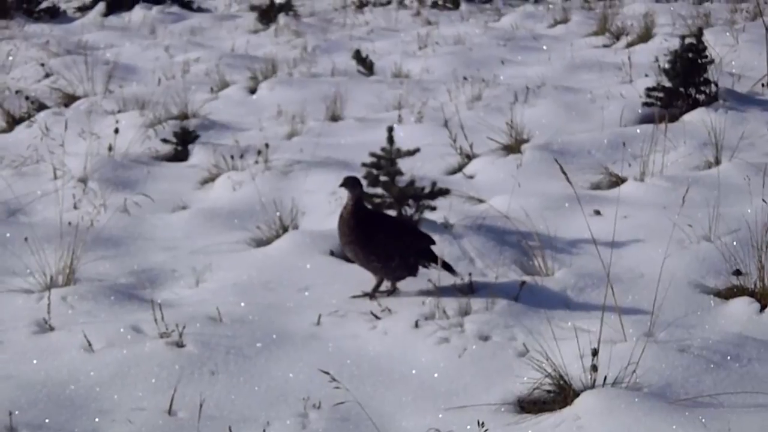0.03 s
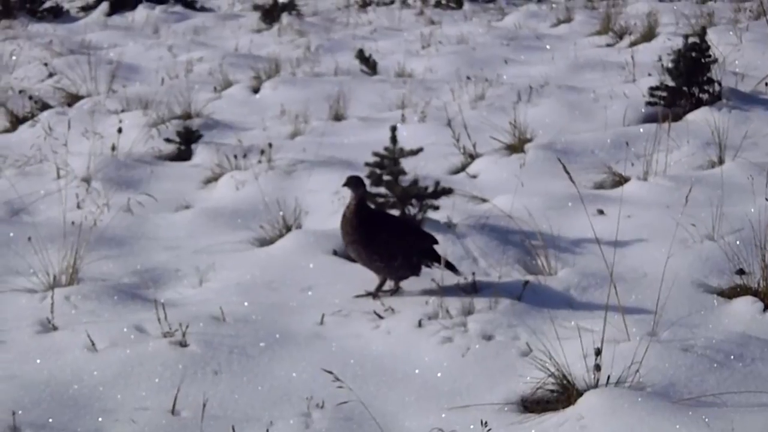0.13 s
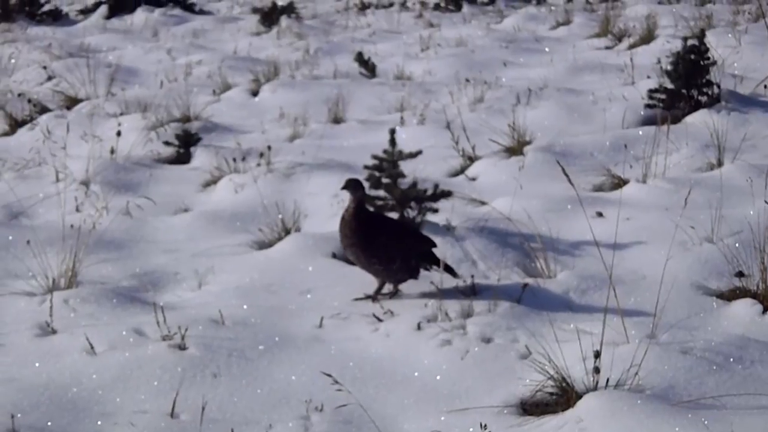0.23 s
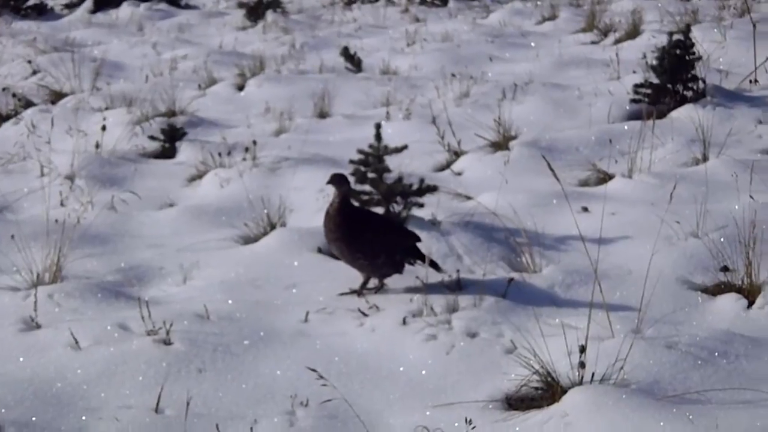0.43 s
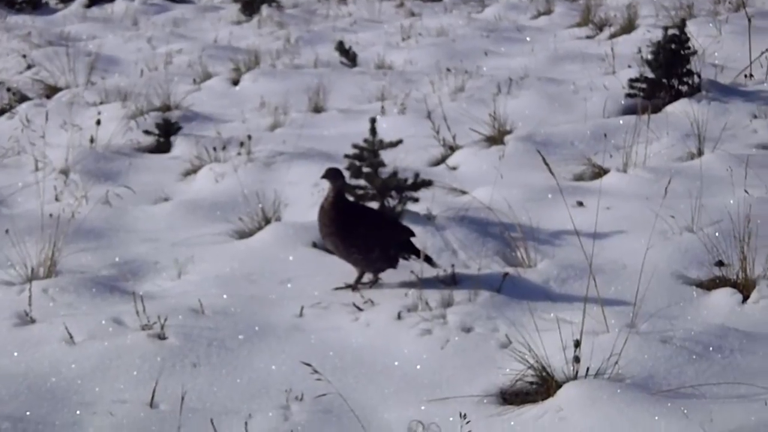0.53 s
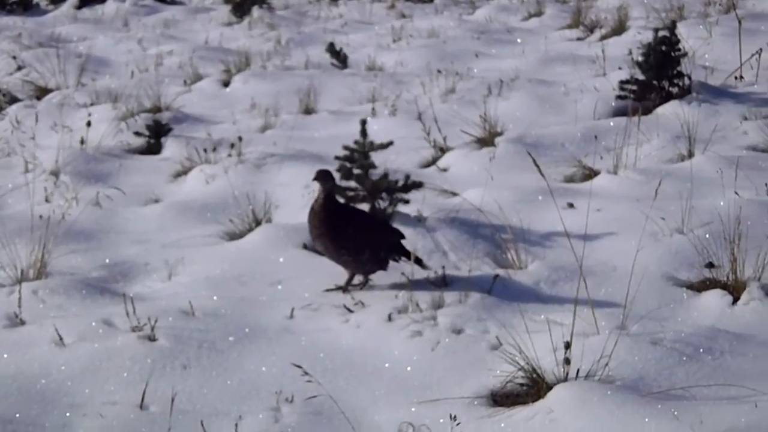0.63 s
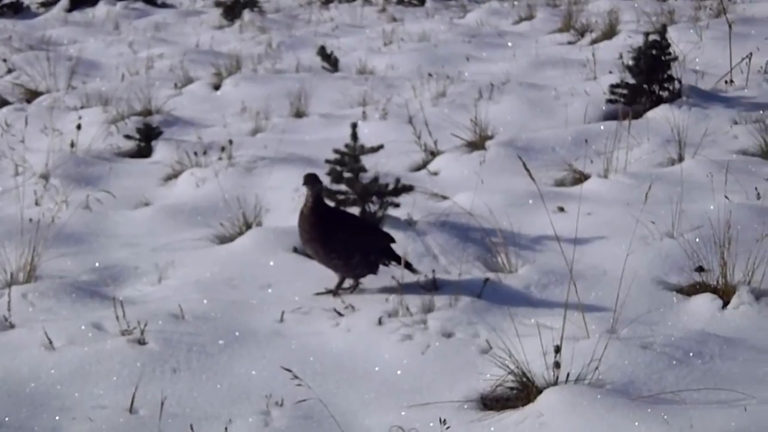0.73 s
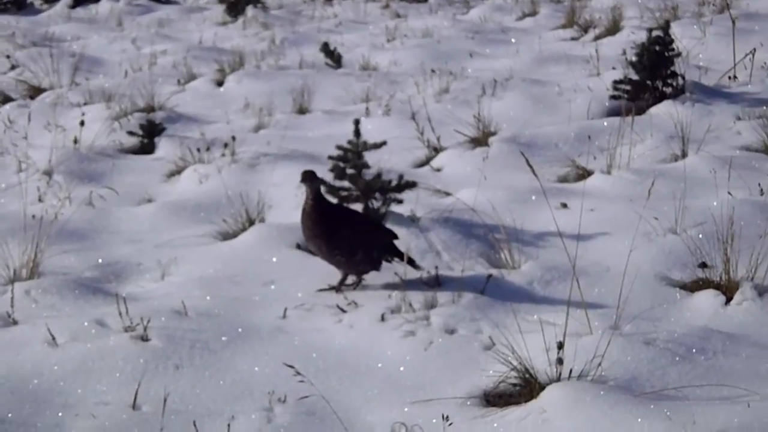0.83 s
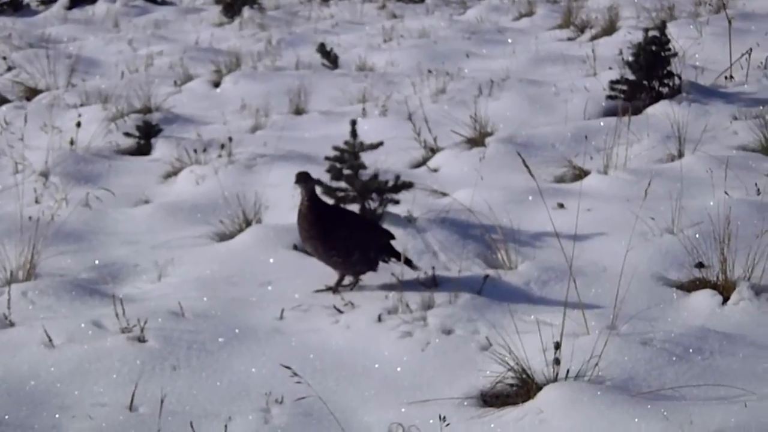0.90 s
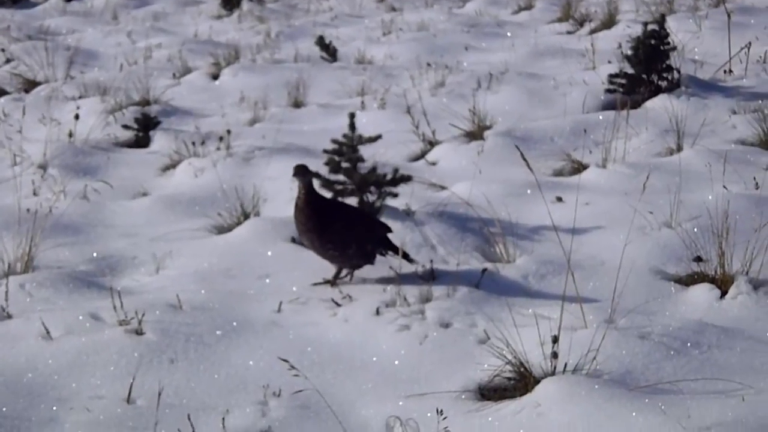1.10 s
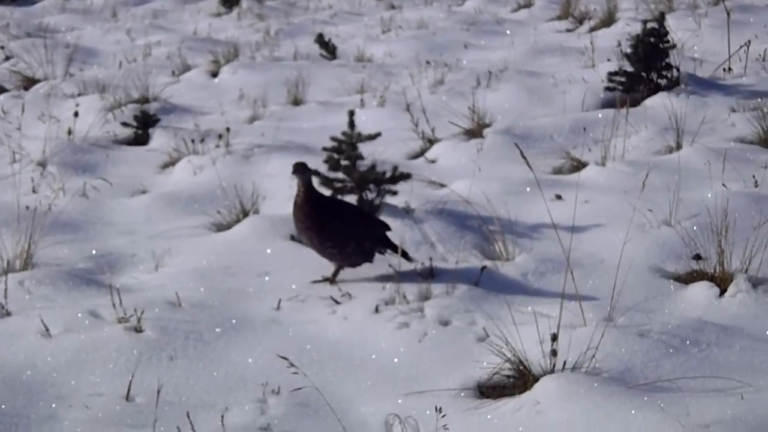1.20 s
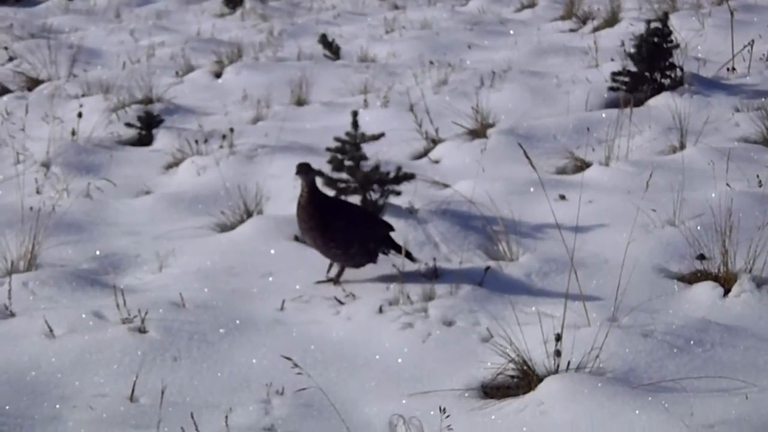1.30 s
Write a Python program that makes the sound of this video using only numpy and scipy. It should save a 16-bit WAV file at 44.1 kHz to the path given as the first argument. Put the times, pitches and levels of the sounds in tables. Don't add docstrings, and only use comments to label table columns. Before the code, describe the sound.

Steady low wind rumble presses on a small hand-held camera microphone on an open snowy slope, with soft hollow flutters, one sudden dull handling thump near the start, and a very faint high motor whine.

```python
import sys
import numpy as np
from scipy import signal
from scipy.io import wavfile
from scipy.ndimage import uniform_filter1d

SR = 44100
rng = np.random.default_rng(int(sys.argv[2]) if len(sys.argv) > 2 else 0)


def generate_wav(sig):
    pcm = np.round(np.clip(np.atleast_2d(sig).T, -1, 1) * 32767).astype(np.int16)
    wavfile.write(sys.argv[1], SR, pcm)


def gain_from_db(level_db):
    decades = np.asarray(level_db, float) / 20
    return 10 ** decades


N = 59535

# t/s, gust level/dB, strength of the air crossing the middle cavity/dB
WIND_COURSE = [
    (0.0, -52, -59),
    (0.112, -52, -55),
    (0.338, -52.5, -64.5),
    (0.566, -52.5, -63),
    (1.35, -51.5, -55),
]


def level(x, db):
    return x * gain_from_db(db) / np.sqrt(np.mean(x ** 2))


def band(hz, width_hz):
    lead_in = 4096
    b, a = signal.iirpeak(hz, hz / width_hz, fs=SR)
    noise = rng.standard_normal(N + lead_in)
    once = signal.lfilter(b, a, noise)
    twice = signal.lfilter(b, a, once)
    return level(twice[lead_in:], 0)


def walk(rate_hz):
    hold = int(SR / rate_hz)
    steps = np.repeat(rng.standard_normal(N // hold + 1), hold)
    slewed = uniform_filter1d(uniform_filter1d(steps, hold), hold)
    return 1.06 * slewed[:N]


def wind_course(t, column):
    course = np.array(WIND_COURSE)
    return np.interp(t, course[:, 0], course[:, column] - course[:, column].mean())


def port_rumble(t):
    # f/Hz, level/dB per Hz
    air = np.array([(12, -29), (20, 4.5), (580, -3), (925, -7.5), (1060, -8.5), (3640, -30), (4060, -26.5),
                    (4910, -33), (13900, -44)])
    swell_db, flicker_db, gusty_below_hz = 0.66, 0.2, 1300
    gust = wind_course(t, 1)
    out = 0
    for hz in 20 * 2 ** (np.arange(30) / 3):
        gust_share = 1 / (1 + (hz / gusty_below_hz) ** 2)
        db = np.interp(np.log(hz), np.log(air[:, 0]), air[:, 1]) + 10 * np.log10(hz)
        movement = gust + swell_db * walk(2) + flicker_db * walk(13.96)
        out = out + band(hz, hz / 2.46) * gain_from_db(db + gust_share * movement)
    return level(out, -53.5)


def singing_cavities(t):
    # f/Hz, width/Hz, level/dB, flicker/dB
    cavities = [
        (598, 153, -66, -0.7),
        (1049, 157, -64, 1.6),
        (1230, 180, -65.5, 2.1),
        (2924, 560, -77, -0.2),
        (4160, 390, -84.5, 1.7),
    ]
    gust = wind_course(t, 1)
    crossing = 1.2 * wind_course(t, 2)
    out = 0
    for k, (hz, width_hz, db, flicker_db) in enumerate(cavities):
        drive = gust if k else crossing
        out = out + band(hz, width_hz) * gain_from_db(db + drive + flicker_db * walk(11))
    return out


def buffets(t, table, attack_s, t60_s, db):
    wobble_rad = 1.22
    out = 0
    for start_s, peak_db, hz in table:
        u = np.clip(t - start_s, 0, None)
        swell = 1 - np.exp(-(u / attack_s) ** 2)
        shape = swell * np.exp(-np.log(1000) * u / t60_s)
        phase = 2 * np.pi * (hz * u + rng.random()) + wobble_rad * walk(hz / 5)
        out = out + gain_from_db(peak_db + db) * shape / shape.max() * np.sin(phase)
    return out


def middle_cavity_buffets(t):
    # t/s, peak level/dB, f/Hz
    strikes = [(0.089, -43, 569), (0.113, -42.5, 647), (0.148, -48.5, 554), (0.247, -41, 598),
               (0.297, -45, 574), (0.514, -58, 625), (0.855, -41, 591), (0.882, -47.5, 497),
               (0.911, -42.5, 601), (1.0, -41, 617), (1.166, -45.5, 610), (1.217, -46, 577),
               (1.244, -44.5, 592), (1.305, -44, 635)]
    return buffets(t, strikes, attack_s=.005, t60_s=.075, db=-8)


def upper_cavity_whiffs(t):
    # t/s, peak level/dB, f/Hz
    whiffs = [(0.0343, -43, 1150), (0.0917, -42, 1050), (0.1281, -41, 1231), (0.1983, -45, 1197),
              (0.2743, -46.5, 1207), (0.2956, -46, 1230), (0.3112, -44, 1107), (0.4708, -46, 1190),
              (0.4834, -43.5, 1205), (0.5462, -46, 960), (1.0745, -46.5, 1150), (1.1024, -41.5, 1032),
              (1.1448, -46.5, 1230)]
    return buffets(t, whiffs, attack_s=.005, t60_s=.06, db=-9)


def port_puffs(t):
    # t/s, peak level/dB, f/Hz
    puffs = [(0.004, -51, 121), (0.068, -71, 147), (0.29, -51.5, 147), (0.418, -50, 127),
             (0.498, -51.5, 152.3), (0.669, -59, 124.8), (0.89, -45.5, 110), (1.049, -45.5, 130.4),
             (1.189, -45, 149), (1.234, -52, 151.3)]
    return buffets(t, puffs, attack_s=.009, t60_s=.1, db=-6)


def finger_push(t):
    push_s, push_db, rise_s, fall_s = .20371, -3.9, .0008, .00045
    lean_s, lean_db = .0067, -11.9
    spring_s, spring_share = .0011, .65
    vent_hz, vent_q = 42, .295
    flesh_hz, settled_s = 620, .021
    u = t - push_s
    back = np.clip(u, 0, 1) / spring_s
    finger_leaves = np.exp(-.5 * (u / fall_s) ** 2)
    shell_returns = (1 + back) * np.exp(-back)
    fall = (1 - spring_share) * finger_leaves + spring_share * shell_returns
    press_rise = 1 / np.cosh(np.clip(u / rise_s, -30, 0)) ** 2
    press = np.where(u < 0, press_rise, fall)
    lean = np.where(u < 0, np.clip(1 + u / lean_s, 0, 1), fall)
    force = gain_from_db(push_db) * press + gain_from_db(lean_db) * lean
    soft = signal.lfilter(*signal.butter(2, flesh_hz, fs=SR), force)
    w = 2 * np.pi * vent_hz
    b, a = signal.bilinear([1, 0, 0], [1, w / vent_q, w * w], SR)
    return signal.lfilter(b, a, soft) * np.exp(-(u / settled_s) ** 6)


def stepping_motor(t):
    motor_hz, motor_db, octave_db = 3941, -75, -22
    step_hz, step_start, step_rest, step_depth = 59.94, .71, .6, 1
    scatter_db, reverse_chance = 0.5, .55
    step = t * step_hz + step_start
    index = step.astype(int)
    count = index[-1] + 1
    strength = gain_from_db(scatter_db * 3.5 * (rng.random(count) - .5))
    polarity = np.cumprod(np.where(rng.random(count) < reverse_chance, -1, 1))
    pulse = step_rest + np.abs(np.sin(np.pi * step)) ** step_depth
    burst = uniform_filter1d(pulse * (strength * polarity)[index], int(0.0034 * SR))
    whine = burst * np.sin(2 * np.pi * motor_hz * t + 0.45 * walk(30))
    octave = np.cos(4 * np.pi * motor_hz * t) * (1 + np.sin(np.pi * t * 59.6))
    return level(whine, motor_db) + level(octave, motor_db + octave_db)


def scene():
    t = np.arange(N) / SR
    wind = port_rumble(t) + singing_cavities(t)
    rings = middle_cavity_buffets(t) + upper_cavity_whiffs(t)
    mono = wind + rings + port_puffs(t) + finger_push(t) + stepping_motor(t)
    return mono[None]


def low_pass(x):
    return signal.sosfilt(signal.butter(12, 14060, fs=SR, output="sos"), x)


def record(dry):
    top_cut = signal.ellip(8, .3, 50, 13900, fs=SR, output="sos")
    return low_pass(signal.sosfilt(top_cut, dry))


dry = scene()
out = record(dry)
generate_wav(out)
```